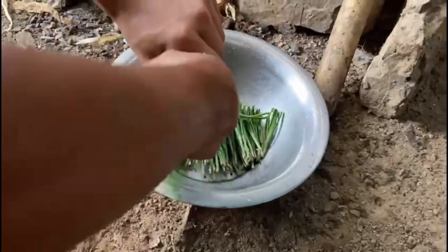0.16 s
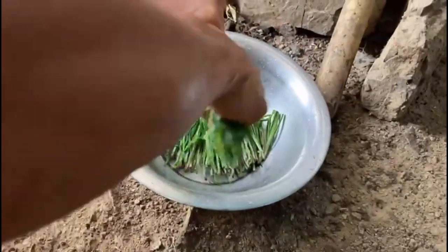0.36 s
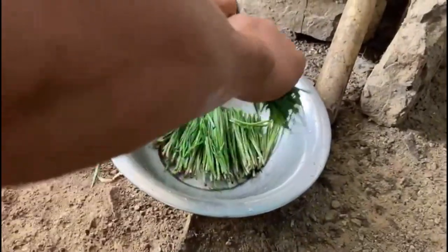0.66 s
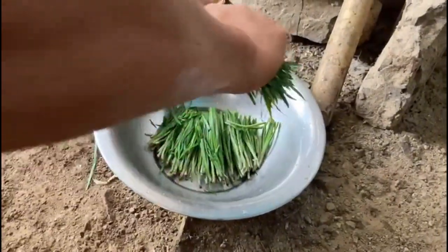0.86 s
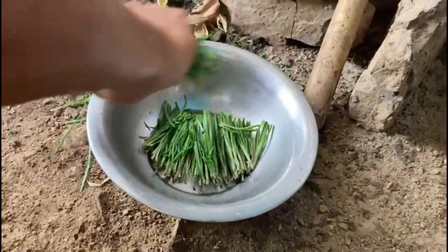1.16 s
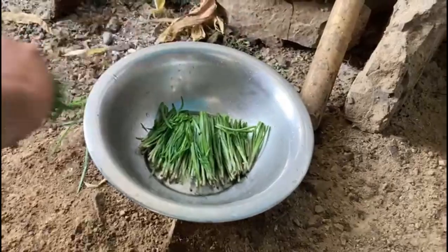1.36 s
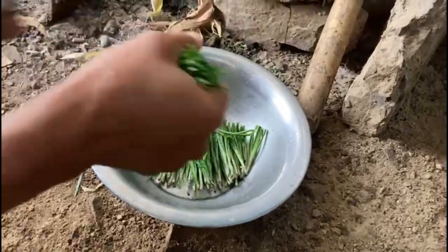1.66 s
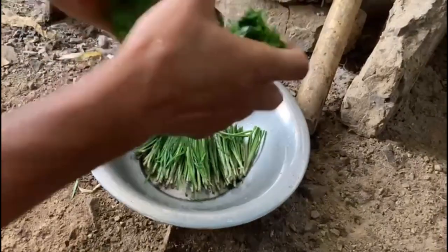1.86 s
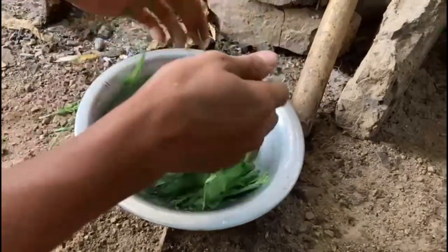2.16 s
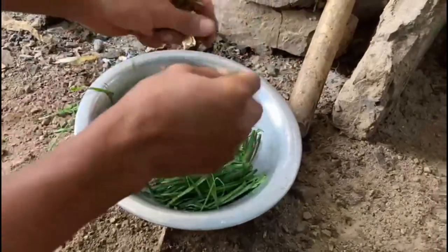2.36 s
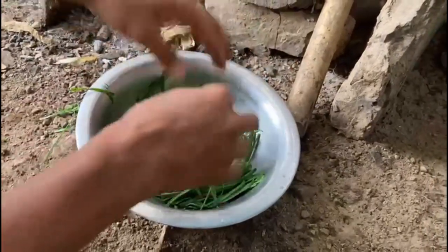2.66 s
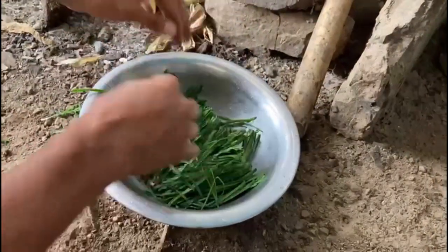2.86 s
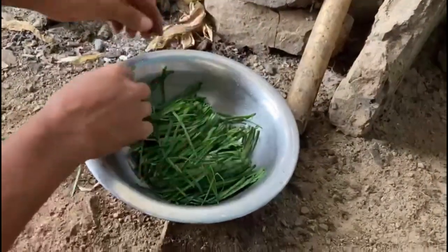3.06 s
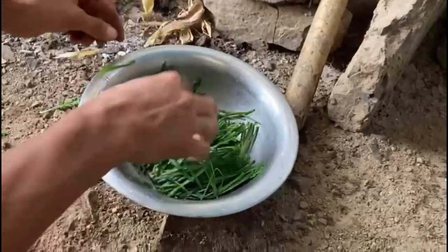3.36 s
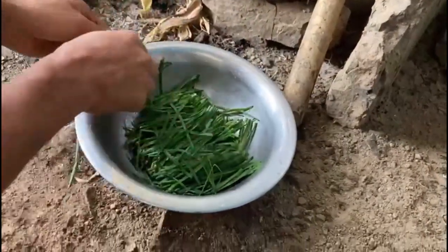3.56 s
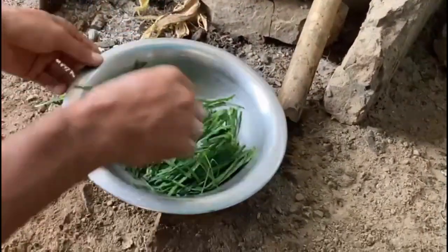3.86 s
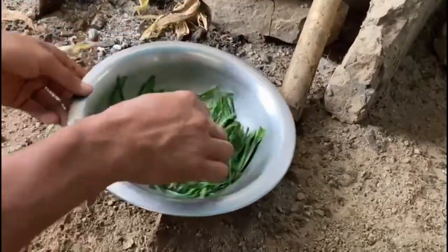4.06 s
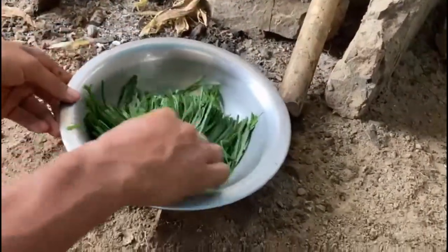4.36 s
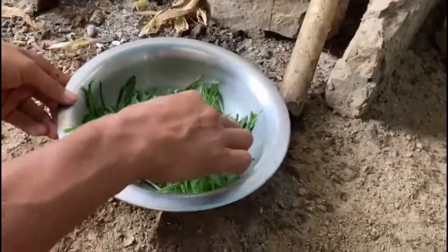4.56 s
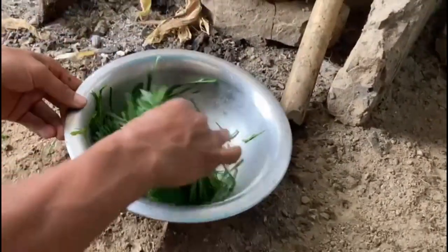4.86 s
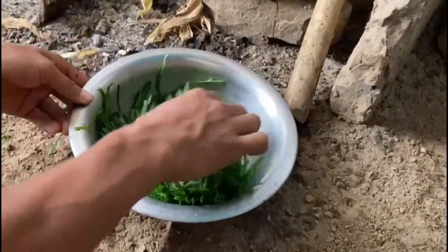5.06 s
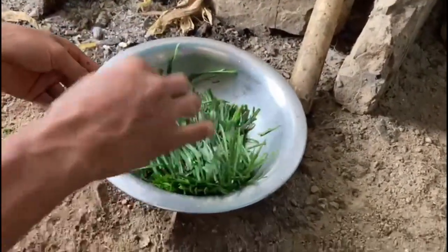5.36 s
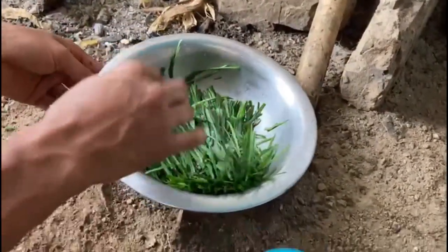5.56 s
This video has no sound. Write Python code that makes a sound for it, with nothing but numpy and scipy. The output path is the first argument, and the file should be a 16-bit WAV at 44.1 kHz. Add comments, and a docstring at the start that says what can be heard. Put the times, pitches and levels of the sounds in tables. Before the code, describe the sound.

Close microphones in a quiet yard catch fresh stems knocking in the fist, then snapping and tearing for almost a second with bright, juicy crackle. The bunch parts suddenly; the pieces drop with a soft rustle into a metal bowl. A pause, then fingers stir them in uneven leafy swishes, with pops and brief muted metallic notes. Faint low rumble, hiss and a steady high insect drone lie behind.

```python
"""Outdoors in a yard, close by: hands wring a bunch of green stems apart, then stir the pieces in a metal bowl.
Stems snap as short noise bursts, and the tear is a dense crackle of tiny ones. Leaves and stems rustle and
rub as slips under each stroke of the hand; thick stems pop at a pitch and the damped bowl rings in its modes.
Far off, a high drone, probably an insect, wavers with two partials over filtered noise: rumble, wash, hiss."""
import sys
import numpy as np
from scipy import signal
from scipy.fft import rfft, irfft, next_fast_len
from scipy.io import wavfile
from scipy.ndimage import uniform_filter1d

SR = 44100
rng = np.random.default_rng(int(sys.argv[2]) if len(sys.argv) > 2 else 0)


def transcribe(signal):
    """Save signal, clipped to [-1, 1], as a 16-bit WAV file at the path in sys.argv[1]."""
    frames = np.atleast_2d(signal).T
    limited = np.clip(frames, -1, 1)
    pcm = np.round(limited * 32767).astype(np.int16)
    wavfile.write(sys.argv[1], SR, pcm)


N = 251634
TIME = np.arange(N) / SR  # seconds

# The ringing modes of the bowl, damped by its load. Each row: frequency in Hz, relative height when struck
# on the bottom in dB, relative height when touched on the wall in dB, time to fall by 60 dB in seconds.
BOWL_MODES = [(218, -3.5, 3.5, 0.097), (357, -11, 0, 0.31), (433.2, 5, 10, 0.14), (720, -6.5, 5.5, 0.14),
              (801, 2, 4.5, 0.086), (931, -12, 11, 0.19), (1308, -1, -1, .036), (3712, -14, -1, 0.092),
              (4230, 17, -9.5, 0.11)]
BOWL_HZ, BOTTOM_DB, WALL_DB, BOWL_T60_S = np.transpose(BOWL_MODES)
# Treble colour of breaking fibres. Each row: frequency in Hz, relative density in dB per Hz.
CRISP_SPECTRUM = [(100, -52), (2500, -16), (4500, 4), (6200, 6), (7700, 16.5), (9000, 25.5), (10500, 27),
                  (11600, 28.5), (12500, -7)]
# Wetter, lower colour of breaking fibres. Each row: frequency in Hz, relative density in dB per Hz.
JUICY_SPECTRUM = [(100, -23.5), (2200, -8.5), (3400, 0), (4220, 12.5), (5400, 2), (7600, 2.5), (12000, -18)]
# Dull, hollow colour of stems in the hand. Each row: frequency in Hz, relative density in dB per Hz.
HOLLOW_SPECTRUM = [(60, -26), (400, -6), (1200, -3.5), (2200, 1.5), (2900, 6), (4500, -1), (12000, -65)]


def amp(db):
    """Decibels to gain."""
    return 10 ** (np.asarray(db) / 20)


def unit(x):
    """Scales to an rms of 1."""
    return x / np.sqrt(np.mean(x ** 2) + 1e-20)


def follow(rows):
    """The columns of a curve table at every sample."""
    s, *columns = np.transpose(rows)
    return [np.interp(TIME, s, column) for column in columns]


def add(mix, s, sound):
    """Lays a sound into the mix at time s."""
    part = mix[..., max(round(s * SR), 0):][..., :sound.shape[-1]]
    part += sound[..., :part.shape[-1]]


def colour(x, spectrum):
    """Filters by a spectrum, keeping the power of white noise."""
    size = next_fast_len(N + 4096)
    hz, db = np.transpose(spectrum)
    log_hz = np.log(np.fft.rfftfreq(size, 1 / SR) + 1)
    gain = unit(amp(np.interp(log_hz, np.log(hz), db)))
    return irfft(rfft(x, size) * gain, size)[..., :N]


def noise():
    """White noise, different at each of the two microphones."""
    return rng.standard_normal((2, N))


def wander(rate_hz):
    """Slow chance of rms 1, one line for each microphone."""
    hz = np.fft.rfftfreq(N, 1 / SR)
    return unit(irfft(rfft(noise()) * np.exp(-(hz / rate_hz) ** 2), N))


def patchy(x, depth_db):
    """Varies the colour of a sound at random: patches about 500 Hz wide and 20 ms long."""
    z = signal.stft(x, nperseg=512, noverlap=384)[2]
    field = rng.standard_normal(z.shape[1:])
    field = uniform_filter1d(field, size=6, axis=0)  # along frequency
    field = uniform_filter1d(field, size=7, axis=1)  # along time
    gain = unit(amp(depth_db * unit(field)))
    return signal.istft(z * gain, nperseg=512, noverlap=384)[1][:, :N]


def crackle(per_s, spread_db, fade_s):
    """Tiny bursts at random moments, a few much larger than the rest; steady on average."""
    struck = rng.random(N) < per_s / SR
    size_db = spread_db * np.minimum(rng.exponential(1, N), 4)
    energy = struck * amp(size_db) ** 2
    power = signal.lfilter([1], [1, -np.exp(-2 / (fade_s * SR))], energy) + 1e-3
    return noise() * np.sqrt(power / uniform_filter1d(power, size=2600))  # evened out over 59 ms


def bowl(force, levels_db):
    """The bowl's modes ring under a force, each with its own starting height."""
    t = TIME[:SR // 3]
    ring = np.zeros(len(t))
    for hz, t60, db in zip(BOWL_HZ, BOWL_T60_S, levels_db):
        ring += amp(db - 60 * t / t60) * np.sin(2 * np.pi * hz * t)
    return signal.oaconvolve(force, ring[None], axes=1)[:, :N]


def over_bowl(x, ring_db):
    """A sound made just above the bowl sets its modes ringing with its treble."""
    treble = signal.sosfilt(signal.butter(2, 2500, "high", fs=SR, output="sos"), x)
    return x + amp(ring_db) * bowl(treble, WALL_DB)


def microphones(x):
    """The two sides share parts of the spectrum, and each frequency leans a little to one side."""
    # The microphone pair. Each row: frequency in Hz, left-right likeness (limited to +-0.98 below),
    # left minus right in dB.
    pair = [(460, 0.93, 0), (825, 0.28, 0.5), (1200, 0.39, 1.5), (2140, 0.26, 1), (3730, -0.53, 1.5),
            (7290, 0.82, -1), (9140, -2.07, 1), (11000, 1, -0.5)]
    hz = np.log(np.fft.rfftfreq(N, 1 / SR) + 1)
    at, likeness, left_db = np.transpose(pair)
    same = np.clip(np.interp(hz, np.log(at), likeness), -.98, .98)
    lean = amp(np.interp(hz, np.log(at), left_db) / 2)
    mid, side = rfft(x) * np.sqrt([(1 + same) / 2, (1 - same) / 2])
    return irfft([(mid + side) * lean, (mid - side) / lean], N)


def air(rumble_db=-58.5, hiss_db=-70, wind_db=-63.0):
    """Low outdoor rumble and a dull wash under faint hiss; a light breeze adds to the right side's lows."""
    # Low rumble. Each row: frequency in Hz, relative density in dB per Hz.
    rumble_spectrum = [(15, -44), (40, -12), (68, 2.5), (110, -4.5), (190, -8), (300, -28), (3000, -98)]
    # Faint hiss. Each row: frequency in Hz, relative density in dB per Hz.
    hiss_spectrum = [(100, 4.4), (500, 4.3), (1300, 5.9), (3500, 10), (4800, 20.4), (6500, 4.4),
                     (12000, 6.3)]
    # Dull far-off wash. Each row: frequency in Hz, relative density in dB per Hz.
    wash_spectrum = [(100, -6.5), (420, 5), (700, -11.5), (3000, -27)]
    # The wash comes and goes. Each row: time in seconds, level in dB.
    wash_level = [(0, -59.5), (1.8, -82.5), (2.5, -69.5), (3.1, -73.5), (3.55, -60.5), (4.3, -72.5),
                  (5.7, -64)]
    rumble = colour(noise(), rumble_spectrum) * amp(rumble_db)
    wash = colour(noise(), wash_spectrum) * amp(follow(wash_level)[0])
    hiss = colour(patchy(noise(), depth_db=6.0), hiss_spectrum) * amp(hiss_db)
    heard = microphones(rumble + wash + hiss)
    low_pass = signal.butter(2, 100, fs=SR, output="sos")
    breeze = unit(signal.sosfiltfilt(low_pass, heard[1]))
    return heard + np.outer([0, 1], amp(wind_db) * breeze)


def insect(level_db=4.0, pitch_hz=2976, hz_per_db=2.5, wobble_hz=2, second_db=-10, scatter=0.72,
           lag_turns=0.18, second_lag_turns=.3):
    """A tone swells about four times a second, higher when louder; scattered paths make its partials flicker."""
    # Course of the high drone. Each row: time in seconds, level in dB before level_db and the swell.
    drone = [(0, -55.5), (1.5, -59), (1.65, -61), (2.0, -58.5), (2.6, -55), (3.4, -55.5), (4.25, -58.5),
             (5.7, -55.5)]
    swell_period_s, swell_at_s, swell_db = .2365, .305, 2
    swell = swell_db * np.cos(2 * np.pi * (TIME - swell_at_s) / swell_period_s)
    db = follow(drone)[0] + swell
    hz = pitch_hz + hz_per_db * swell + wobble_hz * wander(rate_hz=33.0)[0]
    turns = np.cumsum(hz) / SR
    out = np.zeros((2, N))
    for k, (partial_db, lag) in enumerate([(0, lag_turns), (second_db, second_lag_turns)], 1):
        paths = 1 + scatter * (wander(rate_hz=24) + 1j * wander(rate_hz=24))
        phase = k * turns + np.array([[0], [lag]])  # the right microphone is shifted by the lag
        out += amp(partial_db) * (paths * np.exp(2j * np.pi * phase)).real
    return out * amp(db + level_db) * amp([[.6], [-.6]])  # a little to the left


def stroking():
    """Gains of leaves and of stems: each stroke swells as the hand presses, then dies away."""
    # Movements of the hand through the stems. Each row: peak in seconds, rise in seconds, fall in seconds,
    # leaves rustling in dB, stems rubbing in dB, both before the trims of each layer.
    strokes = [(0.126, 0.036, 0.014, -63, -47.5), (0.256, 0.025, 0.017, -63, -49.5),
               (.38, 0.28, 1, -58.5, -62.5), (.522, 0.013, 0.031, -70, -47.5),
               (2.117, 0.026, 0.026, -41.5, -50.5), (2.144, 0.023, 0.01, -58, -47.5),
               (2.206, 0.019, 0.063, -59, -61), (2.72, 0.21, .2, -69.5, -64.5),
               (2.833, .018, 0.0045, -50.5, -52.5), (2.889, 0.0046, 0.011, -83, -50.5),
               (3.192, 0.042, 0.033, -55, -64.5), (3.301, 0.02, 0.022, -59, -62.5),
               (3.672, 0.0043, 0.03, -44.5, -47), (3.753, 0.02, 0.036, -41.5, -52.5),
               (3.805, 0.022, 0.052, -52.5, -48), (3.946, 0.052, 0.074, -48, -54),
               (4.054, 0.058, 0.03, -38, -47), (4.335, 0.17, 0.57, -52.5, -61),
               (4.442, 0.016, 0.016, -45, -45.5), (4.928, 0.096, 0.061, -51.5, -51.5),
               (5.24, 0.046, 0.095, -59.5, -60.5), (5.278, 0.005, 0.043, -42.5, -47.5),
               (5.39, 0.11, 0.022, -54, -58.5), (5.615, 0.07, 0.057, -58.5, -53.5)]
    power = np.zeros((2, N))
    for s, rise_s, fall_s, *levels_db in strokes:
        age = TIME - s
        pressure = np.exp(-np.minimum(np.where(age < 0, (age / rise_s) ** 2, age / fall_s), 20))
        power += np.outer(amp(levels_db) ** 2, pressure ** 2)
    return np.sqrt(power)


def in_bowl():
    """0 while the bunch is held in the air, 1 once the pieces are in the bowl."""
    return np.interp(TIME, [1.6, 2], [0, 1])


def shimmer(x, t60=0.11, count=60):
    """The crowded upper modes of the thin metal ring at random pitches and strengths."""
    t = TIME[:SR // 4]
    hz = rng.uniform(3390, 11500, (count, 1))
    ring = rng.standard_normal((2, count)) @ np.sin(2 * np.pi * hz * t) * amp(-60 * t / t60)
    return signal.oaconvolve(x, ring / np.linalg.norm(ring[0]), axes=1)[:, :N]


def leaves(level, rustle_db=1, shimmer_db=-8):
    """Leaves slide and brush in tiny slips; in the bowl they set the metal shimmering."""
    # Colour of the rustle. Each row: frequency in Hz, relative density in dB per Hz.
    leaf_spectrum = [(100, -3), (1000, -16.5), (2300, 1), (4000, -2.5), (5500, -8.5), (7700, 2), (9000, -3),
                     (10400, 8.5), (11500, 0), (12400, -2)]
    slips = patchy(crackle(per_s=750, spread_db=2.6, fade_s=.0016), depth_db=4.2)
    rustle = amp(rustle_db) * colour(level * slips, leaf_spectrum)
    return rustle + amp(shimmer_db) * shimmer(rustle * in_bowl())


def rubbing(level, fist_db=1, ring_db=-5):
    """Stems stick and slip: a dull creak in the fist, a ringing scrape on the bowl."""
    # Colour of the scrape on metal. Each row: frequency in Hz, relative density in dB per Hz.
    scrape_spectrum = [(40, -76), (200, 0.5), (450, 6), (950, 12.5), (1400, 8.5), (2100, -9), (3500, -3.5),
                       (12000, -40)]
    touching = in_bowl()
    slips = patchy(crackle(per_s=1200, spread_db=1.5, fade_s=0.0056), depth_db=4.0)
    creak = colour(slips * level * (1 - touching), HOLLOW_SPECTRUM)
    scrape = colour(slips * level * touching, scrape_spectrum)
    ring = unit(bowl(slips * level * touching, WALL_DB)) * scrape.std()  # as strong as the scrape
    return amp(fist_db) * creak + scrape + amp(ring_db) * ring


def knocks(pop_db=2, cycles=3.43, grit_db=-11, grit_s=0.0064, jolt_s=0.00202):
    """A thick stem, or once a hand on the rim, pops with a few cycles of its own pitch and a little grit, and
    jolts the bowl just after."""
    # Dull pops and knocks of thick stems, and at 3.671 s the low thump of a hand striking the bowl's rim. Each
    # row: # start in seconds, level in dB before pop_db or grit_db, pitch in Hz, blow on the bowl in dB.
    knock_rows = [(.089, -25.5, 2040, -35.5), (.091, -41.5, 840, -66), (.1, -40, 2100, -64),
                  (0.125, -38, 2156, -49.5), (.126, -42, 763, -70), (.254, -41, 2060, -50.5),
                  (.511, -39, 2250, -50.5), (1.1777, -44, 453, -47), (1.502, -41, 1180, -70),
                  (2.117, -46, 1210, -67), (2.1467, -47.5, 694, -53), (2.706, -50, 790, -48.5),
                  (2.793, -48, 810, -58.5), (2.828, -45.5, 800, -70), (2.836, -38.5, 2350, -66),
                  (2.884, -46.5, 926, -55), (3.057, -44.5, 2370, -78), (3.073, -45, 2370, -77),
                  (3.671, -50.5, 306, -57), (3.743, -45, 1300, -63), (3.788, -44, 1270, -69),
                  (3.99, -35.5, 1700, -55), (4.389, -33.5, 1260, -50.5)]
    t = TIME[:SR // 15]
    push = np.hanning(SR // 1000)  # soft stems press on the metal for a millisecond
    pops, force, grit = np.zeros((3, N))
    for s, db, hz, bowl_db in knock_rows:
        age = 2 * hz * t / cycles  # 1 at the peak, after half the cycles
        tone = np.sin(2 * np.pi * (hz * t + rng.random()))
        add(pops, s, amp(db + pop_db) * age * np.exp(1 - age) * tone)
        add(grit, s, amp(db + grit_db) * np.exp(-t / grit_s))
        add(force, s + jolt_s, amp(bowl_db) * push / push.sum())
    ring = bowl(force[None], BOTTOM_DB)
    return pops + ring + microphones(colour(grit * noise(), HOLLOW_SPECTRUM))


def snaps(crisp_db=4, hollow_db=-9, rise_s=0.00052, rise_power=0.6, tail_db=-23, tail_s=0.021):
    """A stem gives way in about a millisecond, more slowly when louder; its last fibres part in a faint tail."""
    # Stems breaking. Each row: start in seconds, crisp top in dB before crisp_db, juicy middle in dB.
    stems = [(0.477, -34, -39), (0.5449, -30, -58), (0.6611, -42, -57), (.71, -33, -41.5),
             (0.7345, -42, -46), (0.76, -39, -44), (0.7661, -31, -40), (0.815, -43, -37),
             (.831, -51, -37.5), (.8721, -42, -36.5), (.882, -34, -38), (0.915, -44, -44),
             (0.942, -50, -52), (0.959, -45, -30.5), (.966, -41, -33.5), (.976, -45, -38.5),
             (0.9992, -41, -38.5), (1.046, -48, -45), (1.0623, -36, -42), (1.0755, -40, -37),
             (1.1, -35, -33.5), (1.1449, -40, -33.5), (1.177, -38, -27.5), (1.193, -39, -40),
             (1.2058, -34, -27.5), (1.216, -41, -31.5), (1.236, -44, -38), (1.256, -32, -32),
             (1.282, -52, -31.5), (1.324, -48, -37), (1.3353, -42, -36.5), (1.3653, -48, -27.5),
             (1.455, -57, -29), (1.502, -41.5, -27), (2.8849, -53, -33.5), (4.428, -32, -44),
             (4.76, -48, -66)]
    t = TIME[:SR // 20]
    usual_db = np.mean([max(row[1:]) for row in stems])
    crisp, juicy = np.zeros((2, N))
    for s, top_db, middle_db in stems:
        slowness = amp(max(top_db, middle_db) - usual_db) ** rise_power
        age = t / (rise_s * slowness)
        burst = age * np.exp(1 - age) + amp(tail_db) * np.exp(-t / tail_s)
        add(crisp, s, amp(top_db + crisp_db) * burst)
        add(juicy, s, amp(middle_db) * burst)
    top = colour(crisp * patchy(noise(), depth_db=6.5), CRISP_SPECTRUM)
    middle = colour(juicy * patchy(noise(), depth_db=4.5), JUICY_SPECTRUM)
    hollow = colour(juicy * noise(), HOLLOW_SPECTRUM)
    return top + middle + amp(hollow_db) * hollow


def wringing(peak_s, db, growth_db_per_s, decline_db_per_s):
    """Gain of one part of the wringing: it grows with the twist, and falls fast when the bunch parts."""
    wring_start_s, parted_s, release_db_per_s = .68, 1.511, 548
    growth = growth_db_per_s * np.maximum(peak_s - TIME, 0)
    decline = decline_db_per_s * np.maximum(TIME - peak_s, 0)
    release = release_db_per_s * np.maximum(TIME - parted_s, 0)
    return amp(db - growth - decline - release) * (TIME > wring_start_s)


def tearing():
    """Some 1500 fibres part each second while the bunch is twisted, each with a tiny crack."""
    # Bundles of fibres giving way. Each row: loudest moment in seconds, crisp level in dB, juicy level in dB,
    # growth before in dB per second, decline after in dB per second.
    bundles = [(.748, -56, -52, 205, 182), (.974, -54, -54, 110, 102), (1.105, -45, -43, 137, 225),
               (1.199, -40.5, -35.5, 328, 203), (1.275, -50, -43, 502, 160), (1.369, -42, -37.5, 110, 100),
               (1.475, -65, -39, 133, 89)]
    crisp = np.sqrt(sum(wringing(s, db, up, down) ** 2 for s, db, _, up, down in bundles))
    juicy = np.sqrt(sum(wringing(s, db, up, down) ** 2 for s, _, db, up, down in bundles))
    fibres = patchy(crackle(per_s=1500, spread_db=1.7, fade_s=.0003), depth_db=3.6)
    return colour(fibres * crisp, CRISP_SPECTRUM) + colour(fibres * juicy, JUICY_SPECTRUM)


def crunching(level, crunch_db=-6):
    """Pressed pieces shift against each other in small, uneven jerks."""
    # Colour of the crunch. Each row: frequency in Hz, relative density in dB per Hz.
    crunch_spectrum = [(2700, -7), (3300, -3), (3680, 9), (4400, 4.5), (5400, -23)]
    jerks = patchy(crackle(per_s=450, spread_db=2, fade_s=.003), depth_db=4.5)
    return amp(crunch_db) * colour(level * jerks, crunch_spectrum)


def wall(fade_s=0.033, twin_ratio=1.05, twin_db=-7):
    """Fingers catch the wall of the bowl, which sings briefly with a close pair of notes."""
    # The note shifts with load and grip. Each row: start in seconds, level in dB before rise and fade,
    # pitch in Hz, rise in seconds.
    wall_notes = [(2.398, -56.5, 970, 0.019), (3.669, -43.5, 982, .002), (4.035, -43.5, 930, 0.0061),
                  (4.97, -49, 939, 0.0091), (5.272, -46.5, 927, 0.0087), (5.549, -50, 1015, 0.017)]
    t = TIME[:SR // 2]
    out = np.zeros(N)
    for s, db, hz, rise_s in wall_notes:
        note, twin = np.sin(2 * np.pi * (np.outer([hz, hz * twin_ratio], t) + rng.random((2, 1))))
        swell = (1 - np.exp(-t / rise_s)) * np.exp(-t / fade_s)
        add(out, s, amp(db) * swell * (note + amp(twin_db) * twin))
    return out


def yard(x, wet_db=-13, t60=0.045):
    """A short scatter of echoes, as from the ground, the bowl and the stone wall: a fading noise tail."""
    t = TIME[:SR // 4]
    tail = noise()[:, :len(t)] * amp(-60 * t / t60) * (t > .002)  # no echo in the first 2 ms
    return x + amp(wet_db) * signal.oaconvolve(x, tail / np.linalg.norm(tail[0]), axes=1)[:, :N]


def scene():
    """The hands close by, the air and the insect far off."""
    # The fist creaks ever louder until the bunch parts. One row: reference time in seconds, level there in dB
    # before the trims, growth before in dB per second, decline after in dB per second (negative: growth).
    fist_creak = (1.54, -46, 43, -12)
    leaf_gain, stem_gain = stroking()
    breaking = over_bowl(snaps() + tearing(), ring_db=-45.5)
    rustling = over_bowl(leaves(leaf_gain) + crunching(leaf_gain * in_bowl()), ring_db=-42.0)
    hands = breaking + rustling + rubbing(np.hypot(stem_gain, wringing(*fist_creak)))
    return yard(microphones(hands) + knocks() + wall()) + air() + insect()


def record(dry):
    """A steep low-pass at 12250 Hz: no sound above it."""
    low_pass = signal.firwin(161, 12250, window=("kaiser", 8), fs=SR)
    return signal.oaconvolve(dry, low_pass[None], "same")


dry = scene()
out = record(dry)
transcribe(out)
```